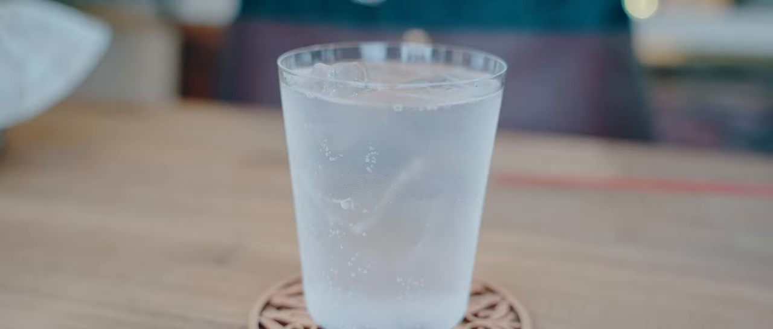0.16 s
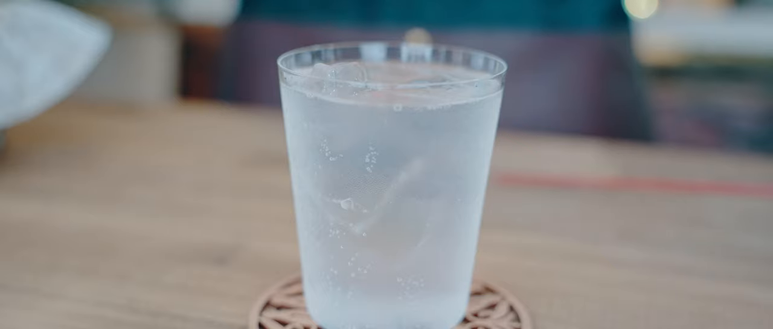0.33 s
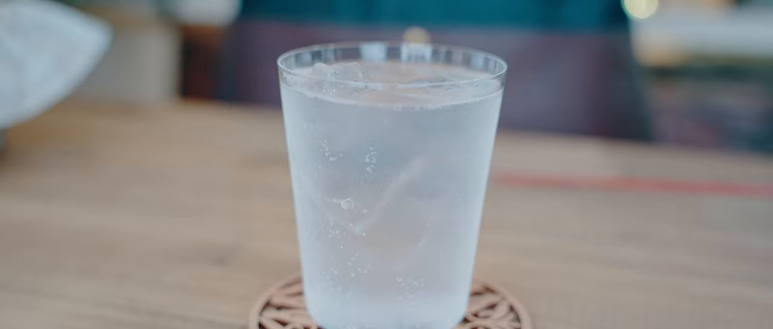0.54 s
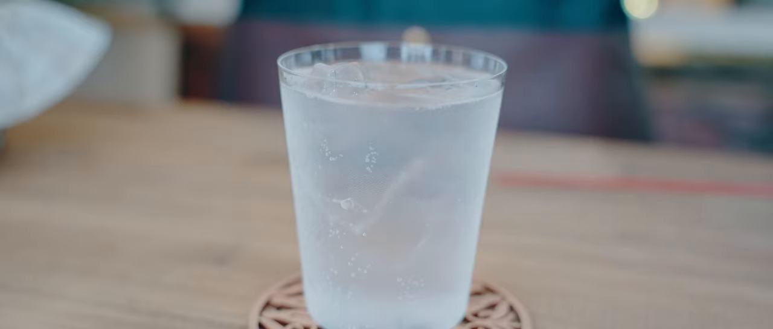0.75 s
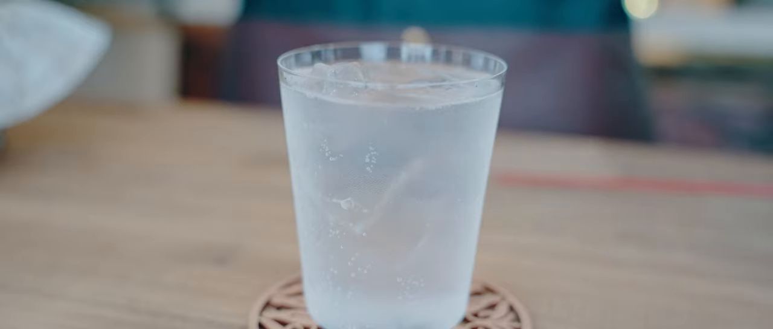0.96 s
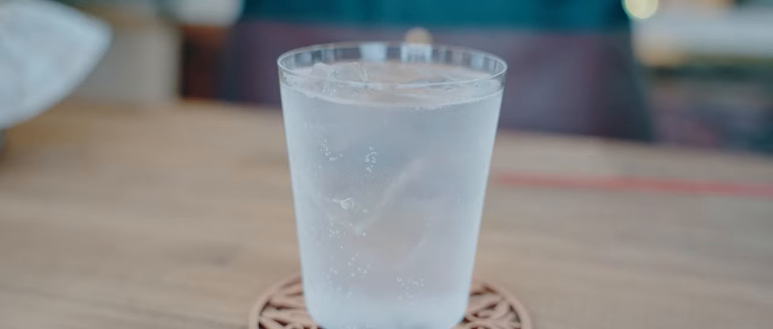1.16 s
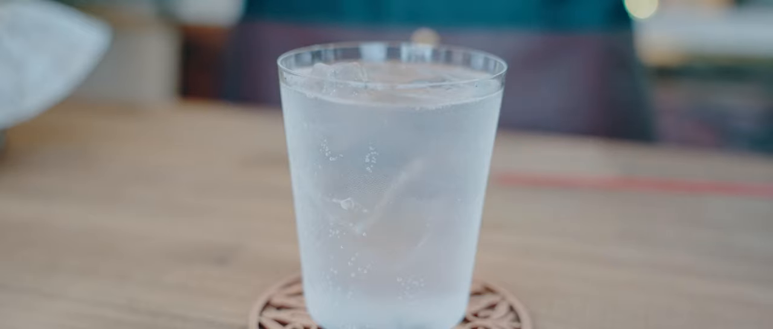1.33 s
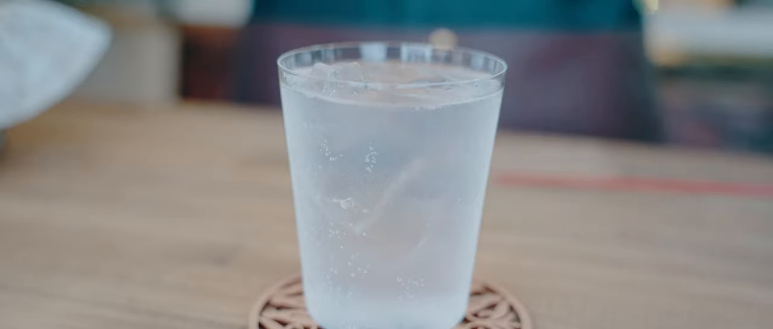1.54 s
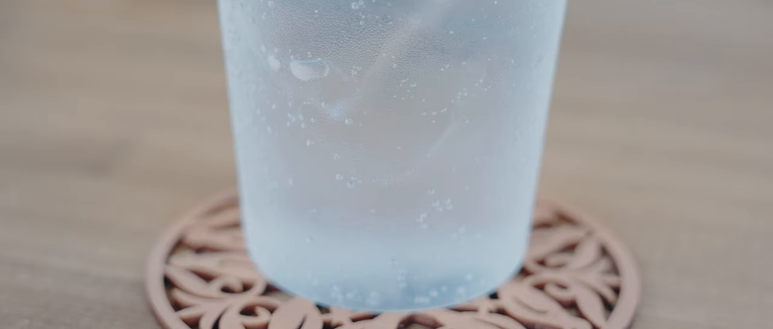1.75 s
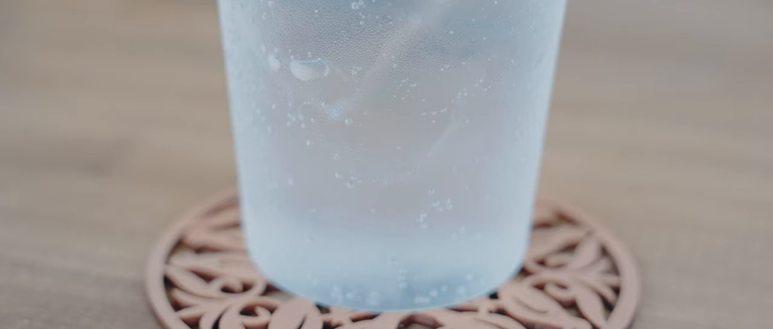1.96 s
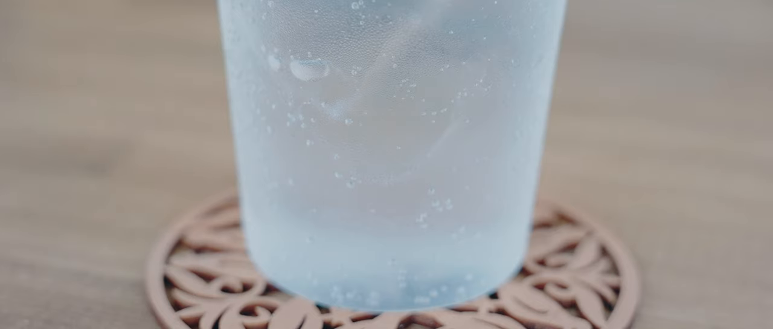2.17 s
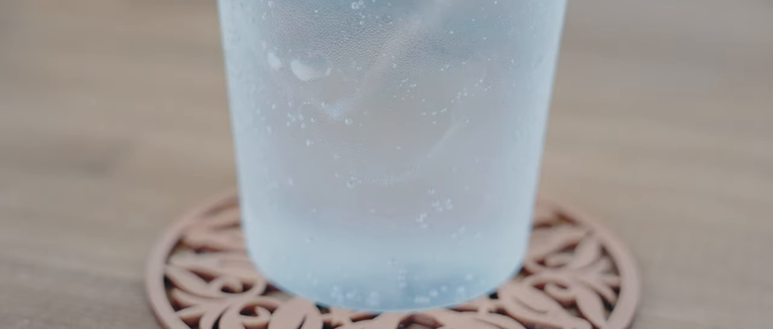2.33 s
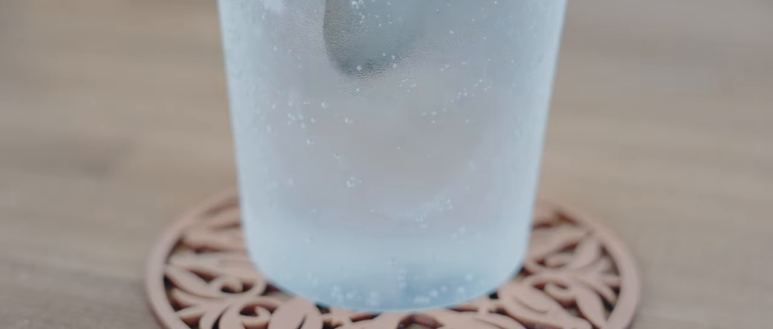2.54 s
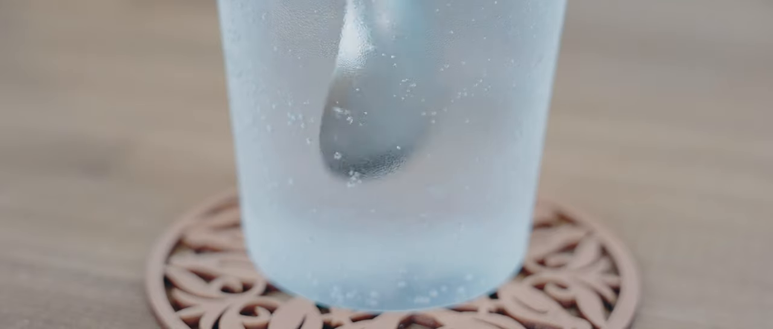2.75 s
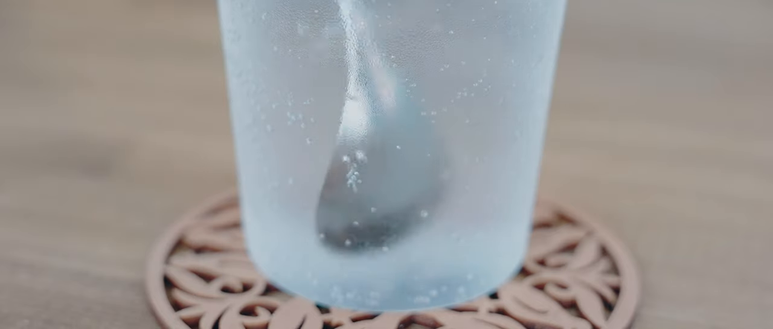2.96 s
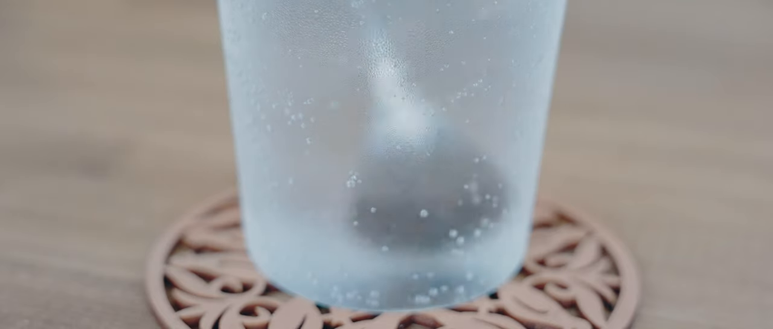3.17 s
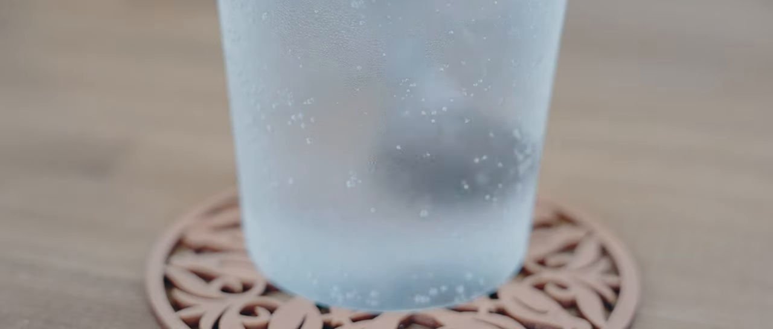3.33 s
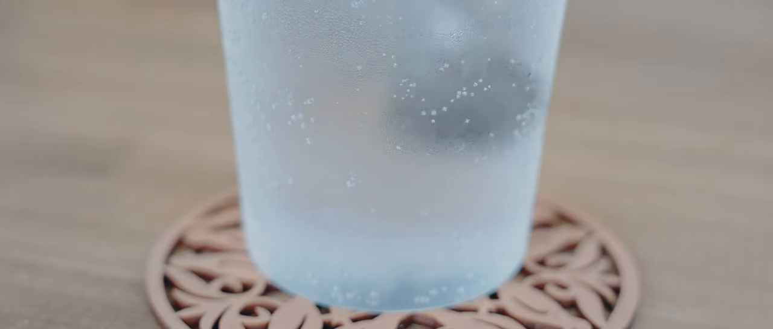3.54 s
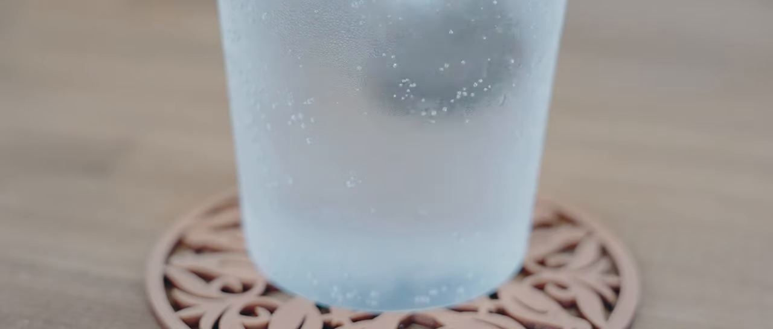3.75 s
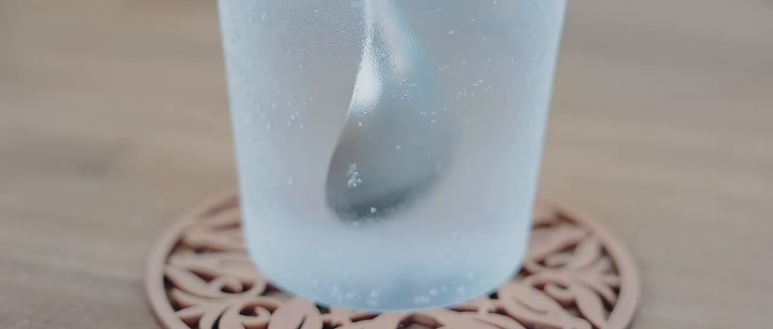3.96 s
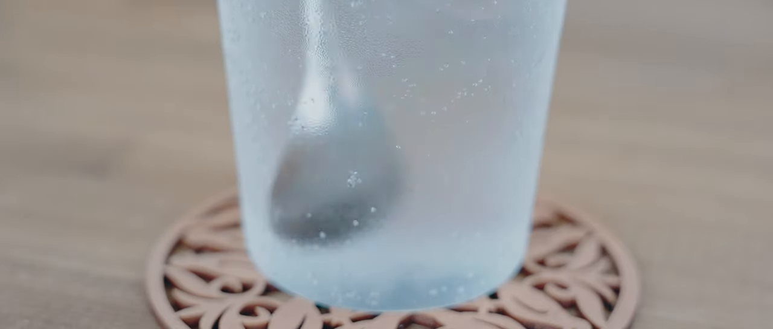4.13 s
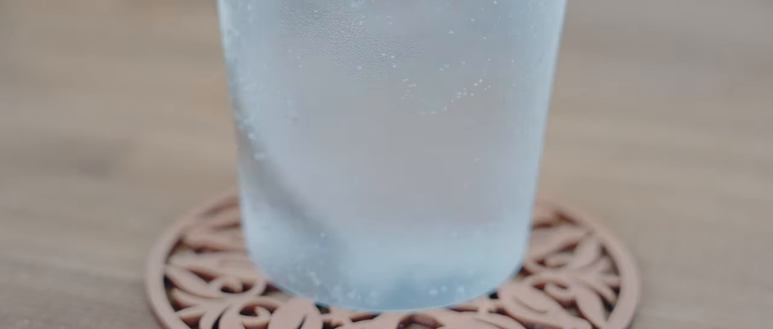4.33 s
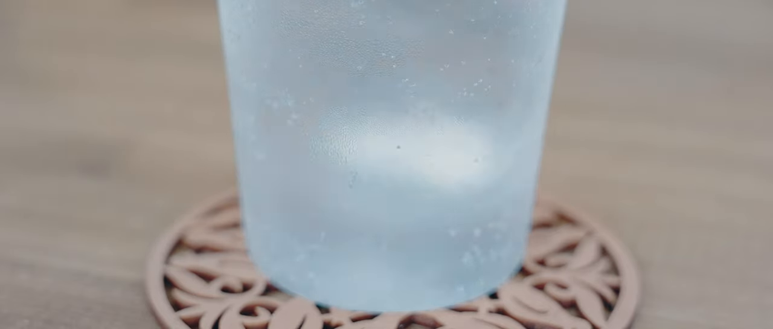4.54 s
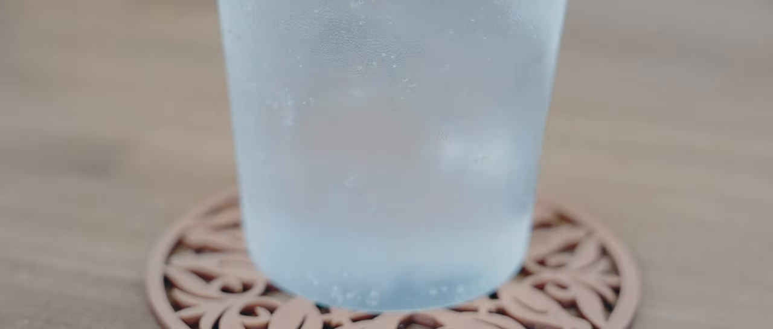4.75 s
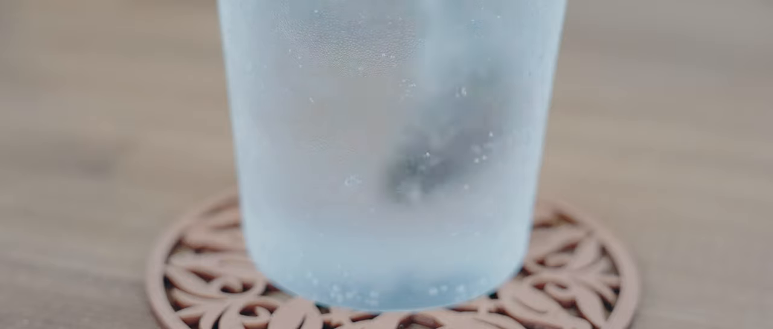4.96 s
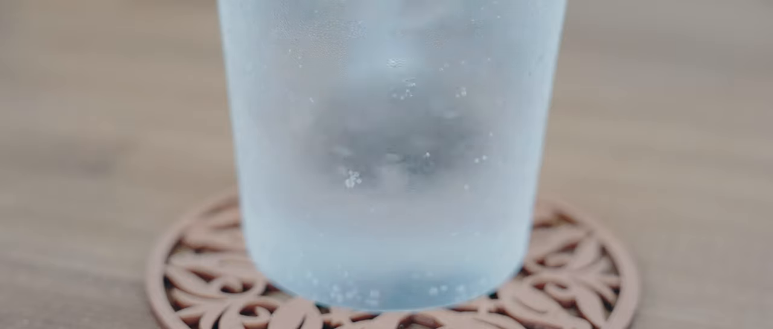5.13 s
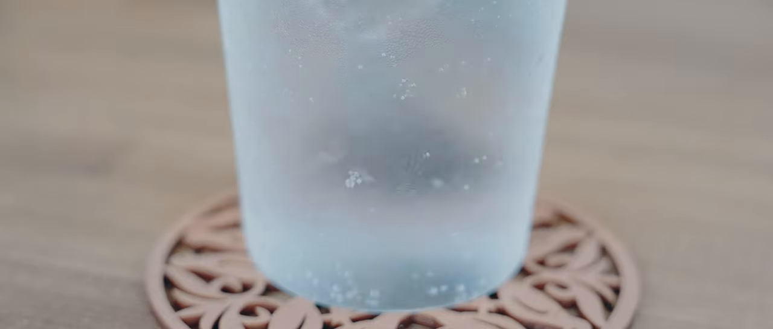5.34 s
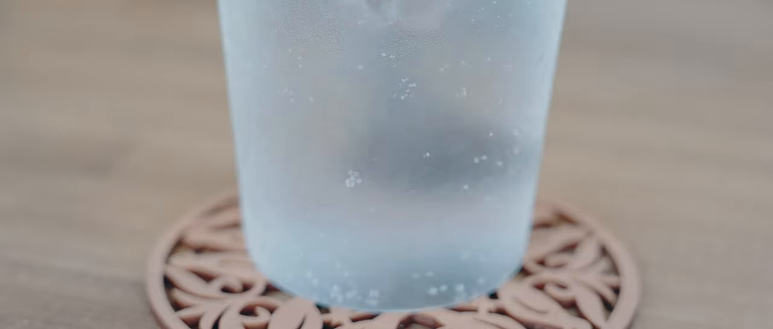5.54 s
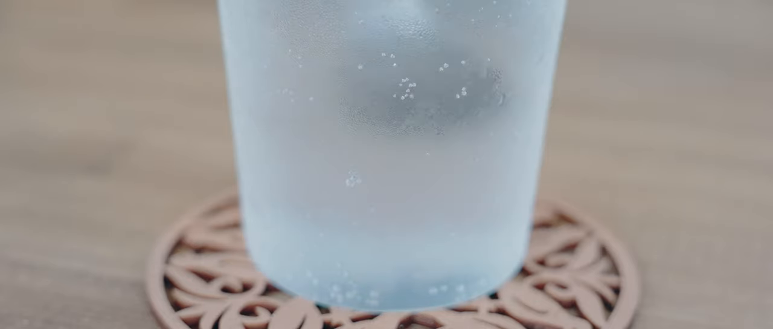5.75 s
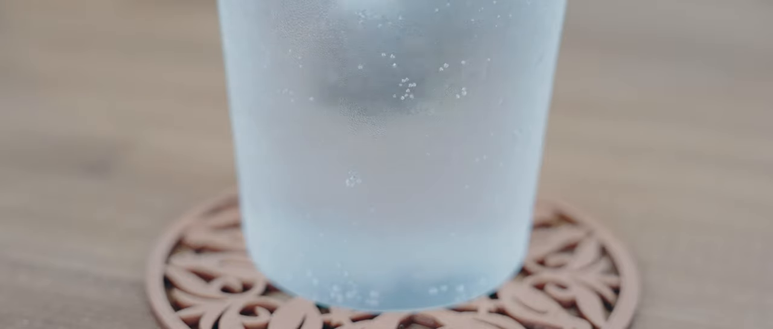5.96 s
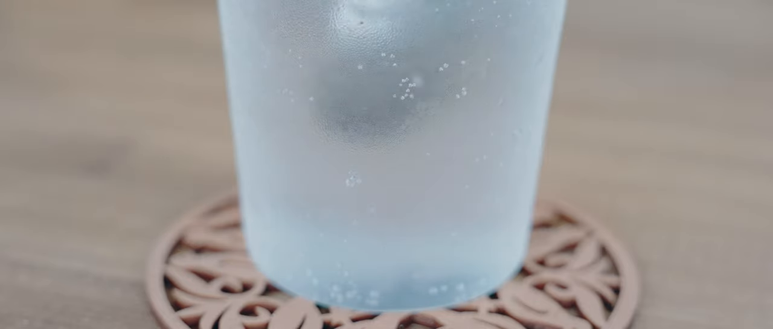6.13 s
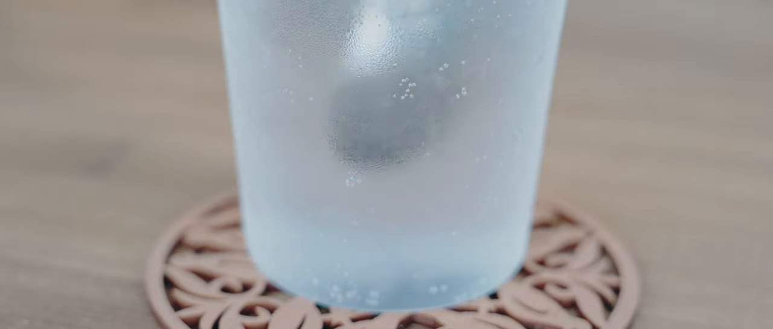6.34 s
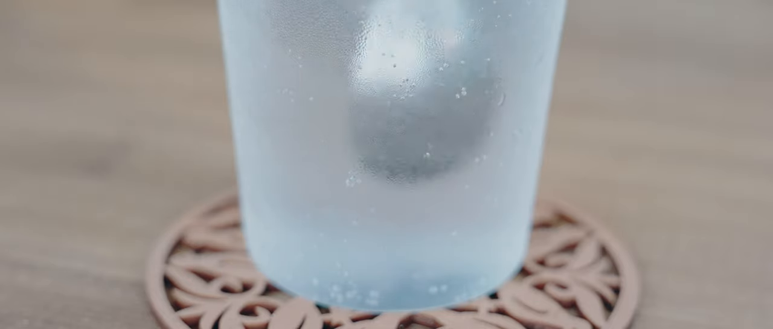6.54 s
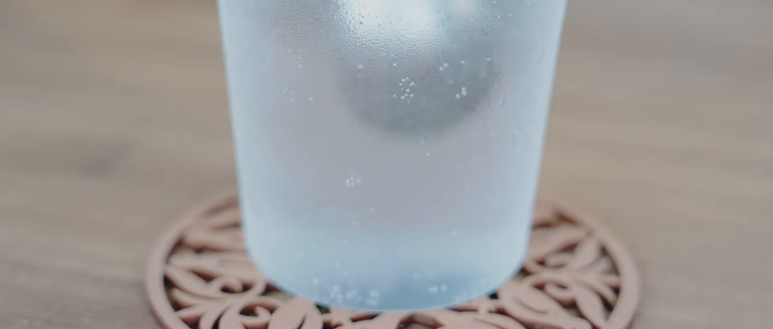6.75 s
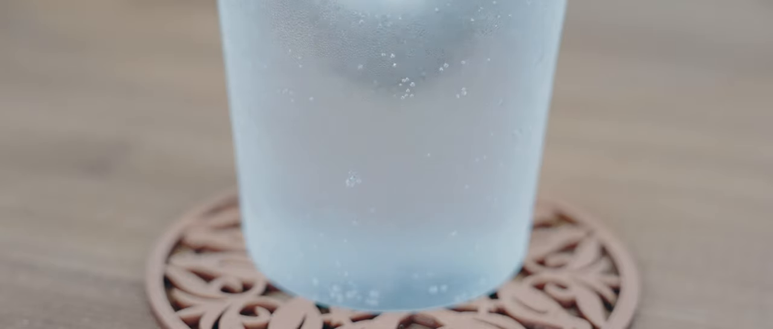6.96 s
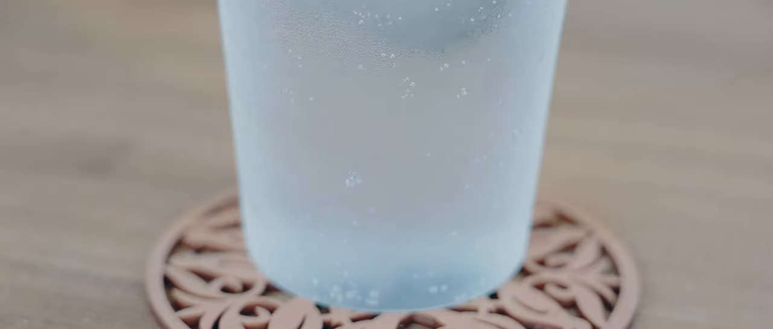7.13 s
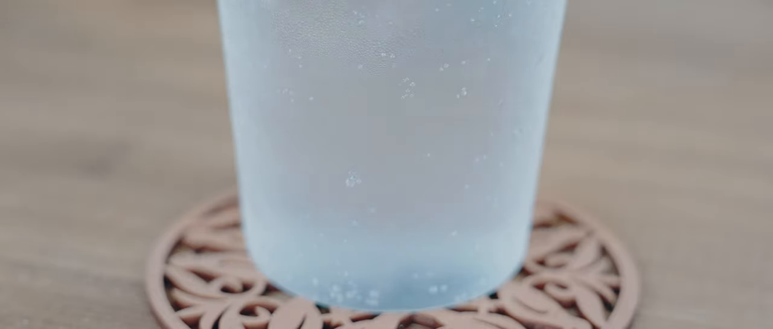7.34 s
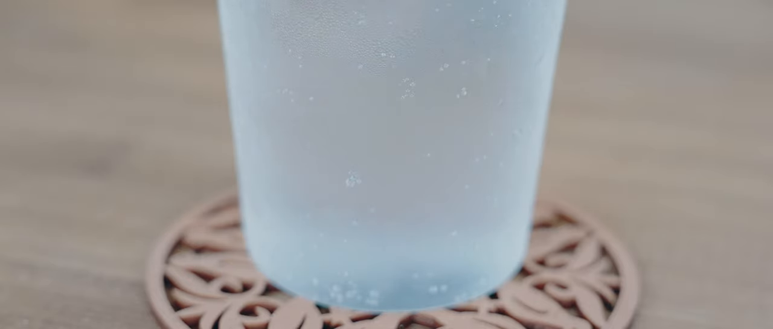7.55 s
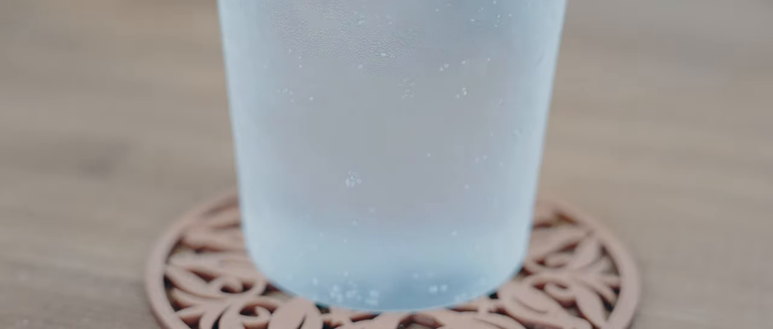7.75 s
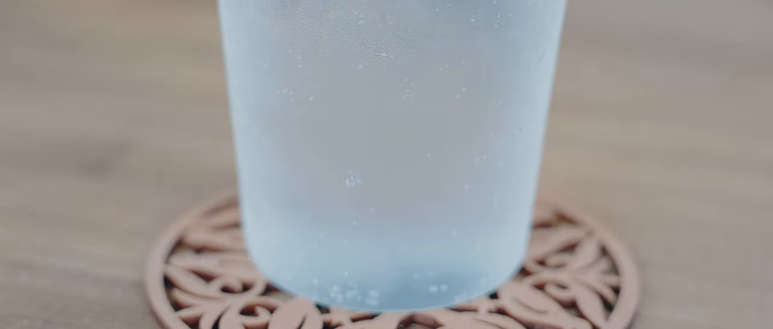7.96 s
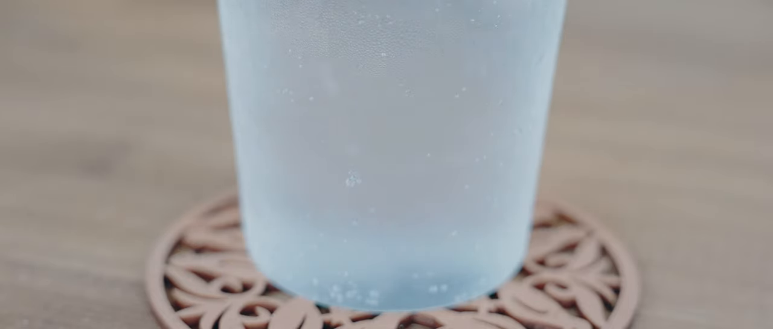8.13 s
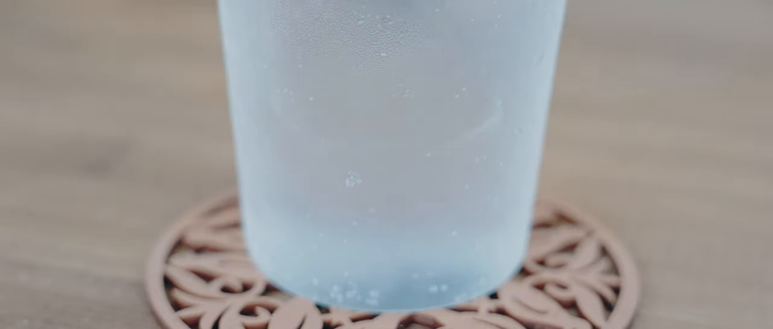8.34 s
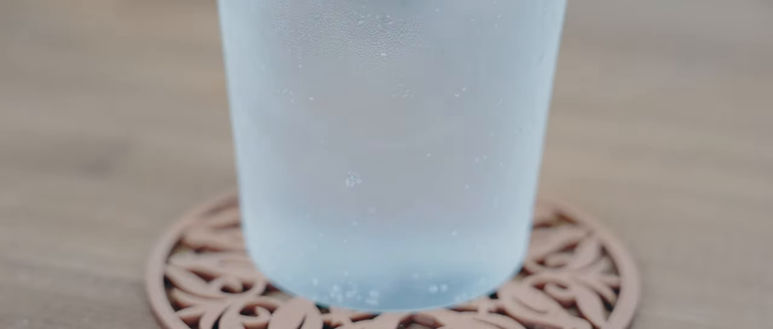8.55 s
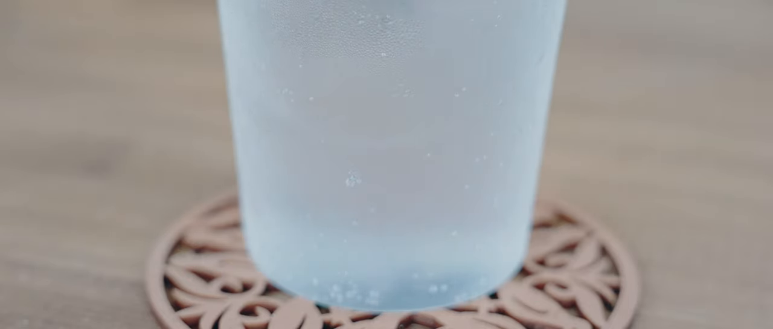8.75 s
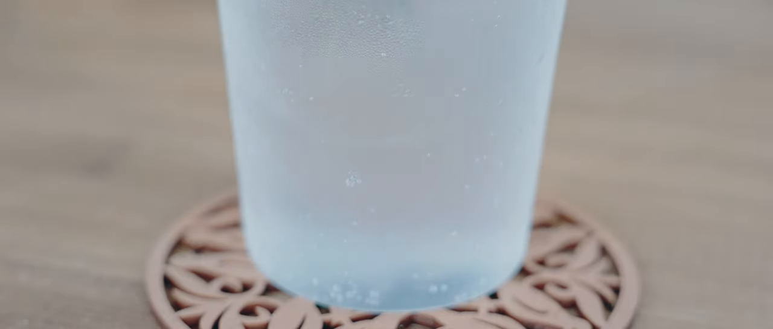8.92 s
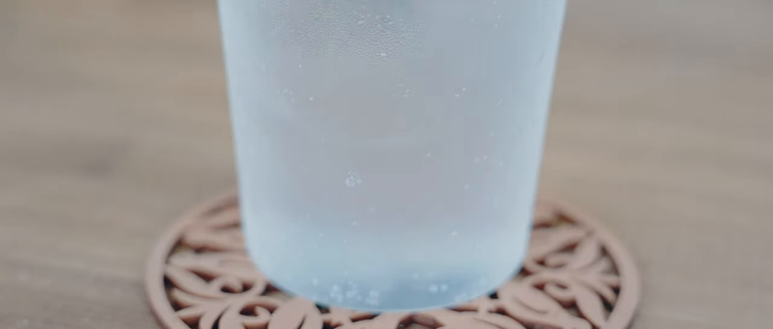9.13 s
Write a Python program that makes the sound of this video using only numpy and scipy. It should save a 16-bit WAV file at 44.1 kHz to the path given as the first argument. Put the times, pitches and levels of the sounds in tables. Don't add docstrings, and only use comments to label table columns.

```python
import sys
import numpy as np
from scipy import signal
from scipy.fft import rfft, irfft
from scipy.io import wavfile
from scipy.ndimage import uniform_filter1d

SR = 44100
rng = np.random.default_rng(int(sys.argv[2]) if len(sys.argv) > 2 else 0)


def how_loud(loudness_db):
    steps = np.asarray(loudness_db, float) / 20
    return 10 ** steps


def unload_audio(sound):
    columns = np.transpose(np.atleast_2d(sound))
    steps = np.round(np.clip(columns, -1, 1) * 32767)
    wavfile.write(sys.argv[1], SR, steps.astype(np.int16))


N = 405279

SPOON_IN_S, SPOON_OUT_S = 2.3, 7.42
EDGES_HZ = 720, 1400, 4500
# (time [s], pitch [Hz])
COLUMN = [(0, 2570), (2.28, 2733), (2.32, 740), (2.75, 954), (3.5, 1100), (3.85, 1014), (4.0, 850),
          (4.6, 850), (5.0, 1335), (5.4, 1705), (6.052, 2068), (9.19, 2030)]


def evened(x):
    return x / np.sqrt(np.mean(x ** 2) + 1e-20)


def peaked(x):
    return x / abs(x).max()


def curve(points, hz):
    f, value = np.transpose(points)
    return np.interp(np.log(hz + 1), np.log(f + 1), value)


def add(mix, time_s, sound):
    part = mix[..., round(time_s * SR):][..., :sound.shape[-1]]
    part += sound[..., :part.shape[-1]]


def resonate(x, hz, width_hz):
    turn = np.exp(2j * np.pi * np.cumsum(hz) / SR)
    r = np.exp(-np.pi * width_hz / SR)
    return 2 * (turn * signal.lfilter([1 - r], [1, -r], x / turn)).real


def ring(modes, chance, detune, spread_db, size=3000):
    t = np.arange(size) / SR
    hz, db, t60_s = np.transpose(modes)[:, :, None]
    shift, weight = chance[:len(hz), None], chance[-len(hz):, None]
    level = how_loud(db + spread_db * weight - 60 * t / t60_s)
    return (level * np.sin(2 * np.pi * hz * (1 + detune * shift) * t)).sum(0)


def struck(band, chance, detune, spread_db):
    # (pitch [Hz], level [dB])
    low = [(680, -9.5), (840, -24.5), (1020, 11), (1220, -17.5), (1420, 15)]
    # (pitch [Hz], level [dB])
    middle = [(1750, -30.5), (2100, 7), (2500, 3), (2900, 8), (3400, 2.5), (4000, -1.5), (4750, -4)]
    # (pitch [Hz], level [dB])
    high = [(5500, 28), (6500, 31.5), (7500, 25.5), (8700, -18), (10200, -8), (11900, 24), (13800, -5)]
    t60_cycles = (24, 17, 15)[band]
    modes = [(hz, db, t60_cycles / hz) for hz, db in (low, middle, high)[band]]
    edge = signal.butter(2, EDGES_HZ[band], "high", fs=SR, output="sos")
    return peaked(signal.sosfilt(edge, ring(modes, chance, detune, spread_db, size=1500)))


def air():
    # (frequency [Hz], density [dB per Hz])
    spectrum = [(10, -0.5), (55, -17.5), (100, -32), (300, -37.5), (1400, -53), (4700, -64.5), (11600, -61),
                (12700, -82.5)]
    # (frequency [Hz], correlation [-1..1])
    likeness = [(60, -0.38), (240, -0.47), (950, 0.8), (3770, 0.59), (15000, -0.62)]
    # (pitch [Hz], level [dB])
    hum_tones = [(285.3, -84), (473.7, -82.5)]
    air_db = -51.5
    whine_hz, whine_width_hz, whine_peak_db = 5200, 760, 9
    frames, hz = N // 512 + 6, np.fft.rfftfreq(2048, 1 / SR)
    a, b, c, d, patches = rng.standard_normal((frames, 1025, 5)).T
    patches = evened(uniform_filter1d(uniform_filter1d(patches, 12, 0), 10, 1))
    whine_db = whine_peak_db * np.exp(-((hz - whine_hz) / whine_width_hz) ** 2)
    same = np.clip(curve(likeness, hz), -1, 1)[:, None]
    left = a + 1j * b
    z = np.array([left, same * left + np.sqrt(1 - same ** 2) * (c + 1j * d)])
    z *= how_loud((curve(spectrum, hz) + whine_db)[:, None] + 1.6 * patches)
    hiss = signal.istft(z, nperseg=2048, noverlap=1536)[1][:, :N]
    t = np.arange(N) / SR
    hum = sum(how_loud(db) * np.sin(2 * np.pi * f * t) for f, db in hum_tones)
    return how_loud(air_db) * evened(hiss) + hum


def room(x):
    # (frequency [Hz], t60 [s])
    decay = [(250, 0.25), (1000, 0.12), (4000, 0.075), (12000, 0.08)]
    taps = np.zeros((2, 16000))
    at = np.arange(100, 15900, 20) + rng.integers(0, 20, (2, 790))
    np.put_along_axis(taps, at, rng.choice([-1., 1.], at.shape), 1)
    hz, t, z = signal.stft(taps, SR, nperseg=256)
    tail = signal.istft(z * how_loud(-60 * t / curve(decay, hz)[:, None]), SR, nperseg=256)[1]
    tail[1] = 0.65 * tail[0] + 1.04 * tail[1]
    return signal.fftconvolve(x[None], tail / np.linalg.norm(tail[0]), axes=1)[:, :N]


def jostling():
    # (start [s], length [s], level [dB])
    swells = [
        (0.0, 0.068, -63),
        (0.144, 0.13, -48.5),
        (0.483, 0.088, -58.5),
        (0.743, 0.017, -50.5),
        (0.928, 0.027, -58),
        (1.06, 0.066, -61.5),
        (1.193, 0.029, -53.5),
        (1.403, 0.096, -69.5),
    ]
    # (start [s], length [s], level [dB])
    drags = [(2.344, 0.21, -56.5), (2.693, 0.017, -42), (2.803, 0.4, -50.5), (3.059, 0.28, -43.5),
             (3.434, 0.06, -45.5), (3.616, 0.17, -64.5), (3.77, 0.19, -49), (3.997, 0.24, -65),
             (4.23, 0.16, -59), (4.419, 0.043, -52), (4.632, 0.16, -65), (4.746, 0.24, -49.5),
             (5.032, .15, -53.5), (5.269, 0.036, -50), (5.462, 0.1, -43.5), (5.723, .08, -37),
             (5.827, .23, -43), (6.071, 0.058, -47.5), (6.247, 0.27, -60), (6.505, 0.14, -47.5),
             (6.731, 0.072, -42), (6.938, 0.045, -41), (7.009, 0.063, -41.5), (7.128, 0.13, -39),
             (7.356, 0.017, -49), (7.616, 0.16, -62), (7.782, 0.072, -46.5), (8.35, 0.22, -66.5)]
    rise_db_per_s, fall_db_per_s, fizz_fall_db_per_s = 890.5, 348.5, 141.5
    still_db, stirred_db, calming_db = -100, -71, -86
    deep_db, deep_db_per_octave = -0.5, -7
    fizz_top_db, ice_top_db = -8.5, -9.5
    top_share = 0.87
    t = np.arange(0, N / SR, .004)
    start, length, db = np.transpose(swells + drags)[:, :, None]
    fall = np.where(start < SPOON_IN_S, fizz_fall_db_per_s, fall_db_per_s)
    surges_db = db - rise_db_per_s * np.maximum(start - t, 0) - fall * np.maximum(t - start - length, 0)
    rest_db = np.where(t < SPOON_IN_S, still_db, np.where(t < SPOON_OUT_S, stirred_db, calming_db))
    middle_db = np.maximum(surges_db.max(0), rest_db)
    column_hz = np.interp(t, *np.transpose(COLUMN))
    low_db = middle_db + deep_db + deep_db_per_octave * np.log2(column_hz / 1000)
    loudest_db = middle_db.max()
    ice_db = loudest_db + ice_top_db + top_share * (middle_db - loudest_db)
    high_db = np.where(t < SPOON_IN_S, middle_db + fizz_top_db, ice_db)
    return t, low_db, middle_db, high_db


def thumps():
    # (time [s], peak [dB], pitch [Hz])
    blows = [(2.328, -39, 179), (2.688, -33, 172), (2.748, -39.5, 176), (2.801, -38, 175),
             (3.056, -34.5, 157), (3.534, -50, 45.8), (4.275, -39, 131), (4.42, -47.5, 201),
             (4.769, -51.5, 159), (5.071, -44.5, 45.8), (5.445, -51.5, 177), (5.723, -41.5, 156),
             (5.883, -40, 159), (6.498, -52, 171), (6.731, -51.5, 119), (6.942, -47, 99),
             (7.12, -45.5, 61.9), (8.109, -44, 182)]
    out, t = np.zeros(N), np.arange(1300) / SR
    for s, db, hz in blows:
        modes = [(hz, 0, .05), (165, -4, .06), (200, -5, .05), (250, -9, .04)]  # (Hz, dB, t60 s)
        push = rng.standard_normal(1300) * np.exp(-t / 0.0084)
        boom = signal.fftconvolve(ring(modes, rng.standard_normal(8), 0.076, 0.89, size=5000), push)
        edge = signal.butter(2, .7 * min(hz, 165), "high", fs=SR, output="sos")
        add(out, s + 0.0082, how_loud(db + 4.0) * peaked(signal.sosfilt(edge, boom)))
    s, low_db = jostling()[:2]
    mutter_hz = np.full(N, 175.)
    mutter = resonate(resonate(rng.standard_normal(N), mutter_hz, 120), mutter_hz, 120)
    return out + how_loud(0.8 * np.interp(np.arange(N) / SR, s, low_db) - 22.0) * evened(mutter)


def gulps():
    # (time [s], level [dB], start pitch [Hz], end pitch [Hz], length [s])
    bubbles = [
        (2.706, -31, 2250, 2950, .02),
        (3.122, -39, 2500, 5500, .026),
        (5.13, -36, 2300, 4900, .022),
        (5.158, -41, 3200, 3800, .012),
        (3.822, -50, 245, 260, .06),
        (4.358, -49, 780, 880, .012),
        (.94, -67, 820, 860, .04),
    ]
    out = np.zeros(N)
    for s, db, start_hz, end_hz, length_s in bubbles:
        u = np.linspace(0, 1, round(length_s * SR))
        phase = 2 * np.pi * np.cumsum(start_hz + (end_hz - start_hz) * u) / SR
        add(out, s, how_loud(db) * np.sin(phase) * np.sin(np.pi * u ** .7))
    return out


def blips():
    s, *levels_db = jostling()
    t, out = np.arange(N) / SR, np.zeros(N)
    for hz in np.geomspace(780, 4600, 16):
        u = np.arange(round(14 * SR / hz)) * hz / SR
        note = np.sin(2 * np.pi * u * (1 + 0.0066 * u)) * (1 - np.exp(-u / 0.54)) * np.exp(-u / 3.8)
        size = how_loud(1.21 * np.minimum(rng.exponential(1, N), 4))
        size = size * (rng.random(N) < 5 / SR) * (t > SPOON_IN_S)
        level_db = np.interp(t, s, levels_db[int(hz > EDGES_HZ[1])]) + 2.0
        out += signal.oaconvolve(size * how_loud(level_db), note)[:N]
    return out


def rattle():
    s, *levels_db = jostling()
    t, out = np.arange(N) / SR, np.zeros((3, 2, N))
    still = t < SPOON_IN_S
    jostle = np.clip((np.interp(t, s, levels_db[1]) + 93.5) / 25, .15, 1)
    jostle[still] *= .35
    clumps_db = 4 * evened(uniform_filter1d(uniform_filter1d(rng.standard_normal(N), 200), 200))
    uneven_db = 3.5 * np.minimum(rng.exponential(1, N), 5) + clumps_db
    size = how_loud(jostle * uneven_db) * (rng.random(N) < 4000 / SR)
    size = size / np.sqrt(uniform_filter1d(size ** 2, 4000) + 1e-9)
    size = size + how_loud(-21.5) * rng.standard_normal(N)
    kind, sign = rng.integers(0, 8, N), rng.choice([-1., 1.], (2, N))
    for k in range(8):
        for band in range(3):
            tap = struck(band, rng.standard_normal(14), .06, 3)
            out[band] += signal.oaconvolve(size * (kind == k) * sign, tap[None], axes=1)[:, :N]
    thin = resonate(np.gradient(out[1], axis=1), np.full(N, 3600.), 2600)
    out[1] = np.where(still, thin, out[1])
    smallest = signal.butter(2, [6600, 8800], "band", fs=SR, output="sos")
    out[2] = np.where(still, signal.sosfilt(smallest, out[2]), out[2])
    power = (out ** 2).mean(1, keepdims=True)
    slow = np.sqrt(uniform_filter1d(uniform_filter1d(power, 2500), 2500))
    return sum(how_loud(np.interp(t, s, db) - 6.0) * b / rms for db, b, rms in zip(levels_db, out, slow))


def knocks():
    # (time [s], peak [dB], ring [Hz], crack re peak [dB]), as in all tables here
    settling = [(0.14, -45, 2750, -26.5), (0.159, -23, 2680, -42.5), (0.227, -6.5, 2770, -28.5),
                (0.327, -49, 2720, -26), (0.347, -31.5, 2600, -25), (0.398, -30.5, 3030, -31),
                (0.743, -26.5, 2910, -37), (0.919, -47, 2300, -36), (1.055, -45, 1900, 2.5),
                (1.124, -37.5, 4200, -2), (1.19, -23, 3660, -7.5), (1.458, -49, 3470, -3),
                (1.974, -56, 740, -16), (2.02, -53, 1880, -20)]
    # (time [s], peak [dB], ring [Hz], crack [dB])
    stirring = [(2.331, -21, 1040, -26), (2.397, -24, 900, -28), (2.476, -40.5, 900, -13),
                (2.495, -23, 900, -16), (2.527, -24.5, 1280, -19), (2.588, -30, 825, -24),
                (2.65, -43.5, 870, -19), (2.684, -19, 1800, -8), (2.749, -17, 1220, -10.5),
                (2.801, -7.5, 1254, -16.5), (2.861, -11.5, 1180, -21), (2.913, -19.5, 1100, -35.5),
                (2.988, -19.5, 1480, -20), (3.07, -11.5, 2980, -10.5), (3.114, -22.5, 1296, -30.5),
                (3.147, -20.5, 1140, -22.5), (3.248, -24.5, 3280, -14), (3.269, -25, 1540, -19.5),
                (3.307, -13, 2170, -18), (3.393, -22, 1190, -15), (3.451, -25, 1190, -11),
                (3.548, -29.5, 2350, -8.5), (3.608, -29, 2080, -19), (3.772, -27, 1000, -18),
                (3.799, -26, 1080, -24), (3.819, -21.5, 1050, -20), (3.894, -31.5, 2870, -27),
                (3.908, -12, 3370, -4.5)]
    # (time [s], peak [dB], ring [Hz], crack [dB])
    circling = [ (4.204, -25, 2850, -19), (4.287, -17, 1930, -7), (4.413, -26, 3130, -43),
                (4.427, -17, 1200, -15.5), (4.514, -42, 1980, -53), (4.55, -38.5, 1670, -23),
                (4.63, -32.5, 1120, -41), (4.718, -33.5, 1030, -20), (4.776, -24.5, 1270, -7),
                (4.901, -26.5, 2030, -32), (4.957, -23, 1730, -18.5), (5.027, -27, 1680, -15.5),
                (5.07, -23.5, 1940, -21.5), (5.124, -23.5, 2800, -30), (5.239, -35.5, 1640, -20),
                (5.279, -22.5, 1440, -2), (5.332, -24, 2700, -21), (5.37, -35, 2060, -17),
                (5.405, -44.5, 2520, -35.5), (5.451, -17.5, 1780, -9), (5.493, -27, 2920, -18),
                (5.509, -20, 3280, -19.5), (5.602, -21.5, 2130, -10)]
    # (time [s], peak [dB], ring [Hz], crack [dB])
    shoving = [(5.707, -35.5, 1776, -29), (5.722, -19.5, 1614, -36), (5.76, -12, 3500, -16),
               (5.8, -8, 3000, -23), (5.836, -11, 3170, -23.5), (5.857, -37, 3100, -24.5),
               (5.886, -6.5, 4560, -62.5), (5.919, -11.5, 3360, -10.5), (5.942, -17.5, 3200, -21.5),
               (5.984, -33, 2970, -1.5), (5.994, -12, 3320, 0), (6.022, -23.5, 2130, -16.5),
               (6.084, -23, 2920, -14), (6.109, -25.5, 2100, -9.5)]
    # (time [s], peak [dB], ring [Hz], crack [dB])
    lifting = [(6.209, -35.5, 3000, -14), (6.282, -34, 2210, -16), (6.375, -33.5, 2200, -16),
               (6.471, -33.5, 2200, -11), (6.508, -26, 3000, -4), (6.548, -30, 2830, -30),
               (6.619, -14.5, 3500, -7.5), (6.725, -23, 2070, -14), (6.742, -22, 2060, -3),
               (6.92, -24.5, 3640, -26.5), (6.942, -9.5, 3230, -51.5), (7.007, -36, 2040, -24),
               (7.023, -14.5, 3570, -16), (7.06, -25, 3530, -2.5), (7.12, -13.5, 4080, -55),
               (7.147, -11.5, 2100, 7.5), (7.194, -21, 2060, -8), (7.259, -11.5, 3700, -12.5),
               (7.341, -20.5, 2160, -41)]
    # (time [s], peak [dB], ring [Hz], crack [dB])
    crowded = [(2.353, -25.5, 890, -22), (2.442, -27, 1330, -10), (2.95, -22.5, 1326, -15),
               (5.73, -22, 1767, 4.5), (5.745, -16, 1837, -18.5), (5.792, -16, 3450, -28),
               (7.621, -36.5, 1940, -12), (5.867, -22.5, 3300, -17.5), (5.971, -10, 2890, -30.5),
               (6.934, -24.5, 2230, -5), (6.957, -14.5, 3410, -16)]
    # (time [s], peak [dB], ring [Hz], crack [dB])
    drifting = [(7.671, -29.5, 3250, -40), (7.684, -20.5, 2020, -46.5), (7.776, -28.5, 2180, -6.5),
                (7.819, -35, 2070, -16), (7.896, -35.5, 1980, -23), (7.961, -44, 970, -12),
                (8.038, -43.5, 2010, -40), (8.088, -41.5, 1840, -13), (8.118, -33, 2140, -14),
                (8.142, -35.5, 2830, -37), (8.255, -36.5, 3280, -8.5), (8.352, -29, 2080, -15),
                (8.453, -43.5, 2120, -18.5), (8.532, -37, 2130, -15), (8.675, -49, 1920, -10)]
    # (time [s], peak [dB], ring
    # [Hz], crack [dB])
    nudges = [(0.174, -38, 3610, -28), (0.197, -30, 2640, -22), (0.209, -20, 2800, -22),
              (0.276, -36, 3380, -22), (0.305, -41, 2690, -27), (0.528, -49, 3230, -24),
              (2.566, -36.5, 821, -29), (2.699, -25, 1400, -11), (2.707, -23, 1330, -18),
              (2.815, -27, 1200, -26), (2.923, -25.5, 1050, -15), (2.936, -30, 1020, -24),
              (3.012, -32.5, 1310, -22), (3.036, -27.5, 1350, -17), (3.074, -21, 1430, -28),
              (3.103, -20.5, 1440, -18), (3.126, -24.5, 1300, -22), (3.183, -23.5, 1340, -17),
              (3.199, -24, 1770, -14), (3.277, -24.5, 1010, -25), (3.333, -39, 3320, -22),
              (3.429, -33.5, 1280, -15), (3.652, -40, 2220, -10), (3.705, -45, 1400, -20),
              (3.72, -43, 1540, -15), (3.749, -37.5, 1050, -9), (3.973, -37, 860, -19),
              (4.046, -48, 850, -17), (4.105, -52, 830, -20), (4.118, -42.5, 834, -19),
              (4.172, -47, 926, -20), (4.336, -43, 785, -18), (4.361, -43, 760, -20),
              (4.689, -47, 920, -22), (4.76, -26.5, 2620, -24), (4.83, -39, 2140, -33),
              (4.849, -40, 2140, -20), (4.872, -32.5, 1570, -22), (4.935, -28.5, 1720, -18),
              (5.054, -30, 1830, -25), (5.081, -27.5, 1480, -17), (5.178, -37, 1520, -22),
              (5.218, -41.5, 1500, -18), (5.431, -26.5, 1780, -24), (5.551, -29.5, 1720, -18),
              (5.678, -40.5, 1510, -12)]
    # (time [s], peak [dB], ring [Hz], crack [dB])
    further = [(5.8064, -21.5, 4160, -13.5), (5.8174, -27.5, 3480, -18), (5.8274, -11.5, 3130, -15.5),
               (5.9124, -14.5, 3400, -24.5), (5.9234, -16, 3120, -21), (5.9514, -11, 2950, -17.5),
               (6.0417, -34, 2030, -12.5), (6.0666, -27.5, 2980, -16.5), (6.0784, -22, 2680, -21.5),
               (6.1908, -44.5, 2080, -14.5), (6.2477, -46, 2530, -18), (6.3505, -44, 2030, -18),
               (6.4393, -41, 2090, -16), (6.5685, -41, 2020, -21), (6.5854, -44, 2060, -20),
               (6.6104, -26.5, 2090, -25), (6.6354, -42, 2920, -32), (6.6747, -36.5, 3500, -18),
               (6.7715, -29, 2110, -14), (6.7994, -38, 2730, -13), (6.8249, -35.5, 3760, -13),
               (6.8987, -36.5, 1550, -15), (6.9844, -25.5, 1980, -17.5), (7.0913, -40.5, 3610, -20),
               (7.1033, -21.5, 4100, -29.5), (7.1284, -21, 3150, -20.5), (7.1504, -10, 3600, -22),
               (7.1634, -24, 3250, -19), (7.2024, -28.5, 1900, -15.5), (7.2114, -29, 1870, -18),
               (7.2214, -29, 2010, -20), (7.2364, -25.5, 1960, -19), (7.2534, -26, 1860, -30),
               (7.2714, -29, 1830, -17.5), (7.3711, -27.5, 1930, -24), (7.4535, -57, 2090, -20),
               (7.5494, -61, 1940, -16), (7.5657, -55, 1800, -18), (7.6041, -50, 3110, -13),
               (7.7074, -42, 2000, -9), (7.7438, -43, 2080, -18), (7.7862, -24, 2000, -16),
               (7.8436, -37, 1500, -18), (7.9059, -38.5, 1810, -18)]
    crunch_s, dry_crunch_s = .0054, 0.0041
    crack_s = 0.0084
    own_t60_cycles = 15.8
    middle_gain_db, crack_gain_db = 1.5, 12
    out, t = np.zeros((2, N)), np.arange(1500) / SR
    times, deep_db, middle_db, _ = jostling()
    contacts = [*settling, *stirring, *circling, *shoving, *lifting, *crowded, *drifting, *nudges, *further]
    for s, db, hz, crack_db in contacts:
        modes, taps = rng.standard_normal((2, 4, 14)), rng.standard_normal((2, 1500))
        lumpy = how_loud(3.3 * evened(uniform_filter1d(rng.standard_normal(1500), 50)))
        crunch = lumpy * np.exp(-t / (crunch_s if s > SPOON_IN_S else dry_crunch_s))
        sharp = how_loud(0.26 * db + 20.5) * np.exp(-t / .0008)
        chatter = taps * (1 - np.exp(-t / 0.00064)) * (crunch + sharp)
        low_db = -5.5 + 1.9 * np.interp(s, times, deep_db - middle_db) - 3 * np.log2(hz / 1000)
        for way in range(2):
            body = peaked(ring([(hz, 0, own_t60_cycles / hz)], modes[way, 0], .01, 1.5, size=1500))
            body += how_loud(middle_gain_db) * struck(1, modes[way, 1], .04, 4)
            body += how_loud(low_db) * struck(0, modes[way, 2], 0.04, 6.6)
            crack = how_loud(crack_db + crack_gain_db) * struck(2, modes[way, 3], .04, 4)
            crack = signal.fftconvolve(crack, chatter[way] * np.exp(-t / crack_s))
            knock = signal.fftconvolve(body, chatter[way]) + crack
            add(out[way], s, how_loud(db - 2.5) * peaked(knock))
    return out


def scene():
    # (time [s], pitch [Hz])
    second = [(2.3, 1400), (2.75, 1340), (3.5, 1330), (4.0, 1300), (5.2, 1500), (5.7, 1550), (6.0, 2900),
              (9.19, 3100)]
    # (time [s], pitch [Hz])
    third = [(2.3, 1950), (3.0, 1885), (4.5, 1830), (5.6, 1910), (5.9, 3375), (9.19, 3517)]
    # (frequency [Hz], side re mid [dB])
    wide = [(60, 13.5), (180, -3.5), (550, 1.5), (1650, -29), (4970, -3), (15000, -8.5)]
    # (note, level dB, width Hz, sounding from s)
    column = [(COLUMN, -2, 30, 0), (second, -4.5, 31, SPOON_IN_S), (third, 0.5, 100, SPOON_IN_S)]
    small = signal.butter(4, [620, 13500], "band", fs=SR, output="sos")
    front, sideways = signal.sosfilt(small, knocks() + rattle())
    t = np.arange(N) / SR
    front = front + sum(how_loud(db) * (t > from_s) * resonate(front, np.interp(t, *np.transpose(note)), width_hz)
                        for note, db, width_hz, from_s in column)
    table = thumps()
    front = front + gulps() + blips() + table
    hz = np.fft.rfftfreq(N, 1 / SR)
    sideways = irfft(rfft(sideways) * how_loud(curve(wide, hz) - 3.0), N) + how_loud(-11.0) * np.roll(table, 90)
    lag_s = np.array([[.35], [-.35]]) / SR
    ports = irfft(rfft(front) * np.exp(-2j * np.pi * hz * lag_s), N) * how_loud([[.3], [-.3]])
    return ports + sideways * np.array([[1], [-1]]) + how_loud(-9.5) * room(front) + air()


def top_cut(x):
    return signal.sosfilt(signal.butter(12, 16680, fs=SR, output="sos"), x)


def record(dry):
    return top_cut(dry)


dry = scene()
out = record(dry)
unload_audio(out)
```